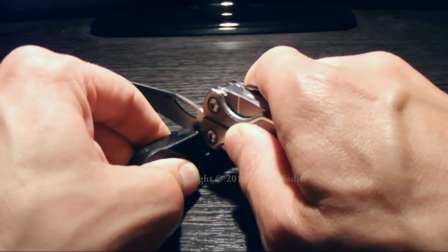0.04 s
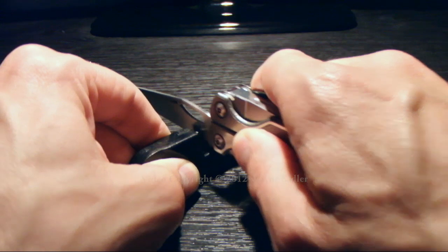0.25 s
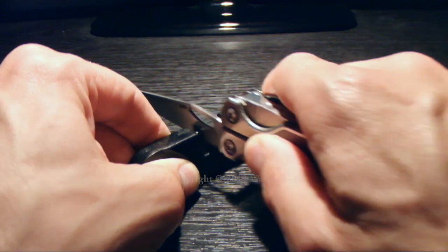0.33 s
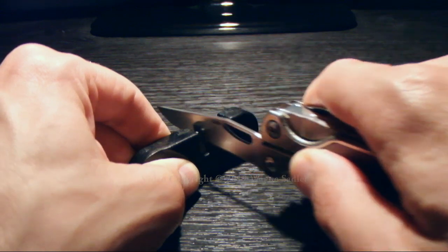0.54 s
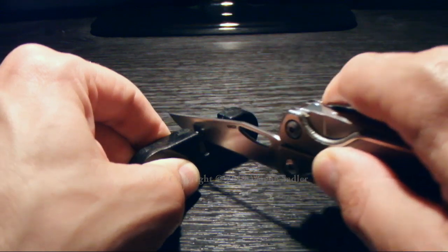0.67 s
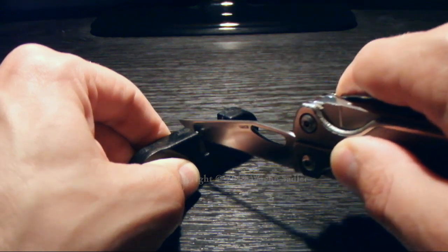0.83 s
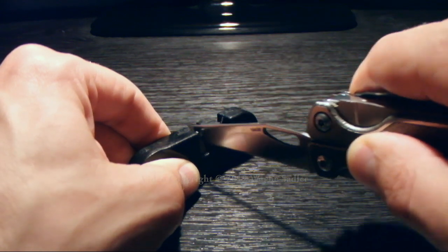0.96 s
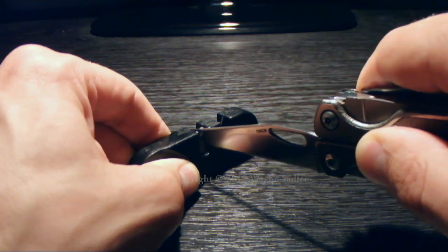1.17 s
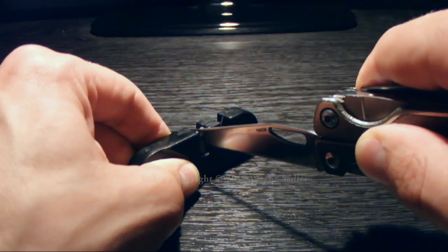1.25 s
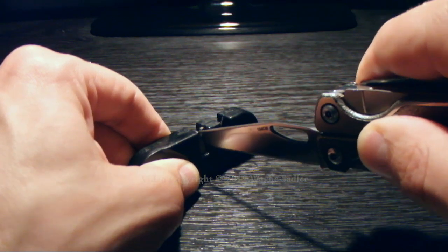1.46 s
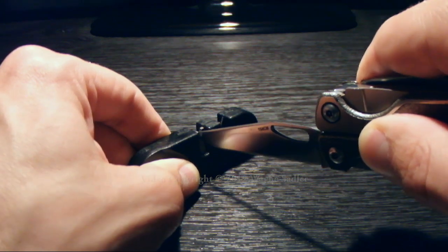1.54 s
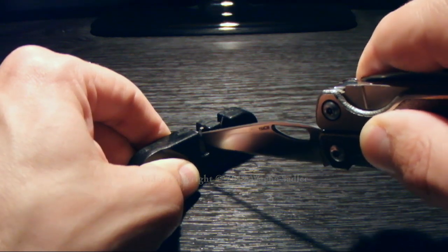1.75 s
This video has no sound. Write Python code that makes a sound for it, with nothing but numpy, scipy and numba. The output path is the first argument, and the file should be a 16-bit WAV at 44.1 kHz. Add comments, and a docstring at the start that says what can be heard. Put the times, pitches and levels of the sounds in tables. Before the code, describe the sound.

A knife knocks into a small hand sharpener on a wooden desk, scrapes through once with a gritty metallic ring, and drops out with a soft clatter. A faint motor buzz follows, heard close in a quiet room.

```python
"""Over quiet room noise, a knife lands with a knock in a small hand sharpener on a wooden desk.
It is pulled through once: grit rasps along the edge and makes the blade and the desk ring.
The tip drops out with a soft clatter, and then a hand rubs briefly.
Last, a tiny motor, probably for a lens, buzzes and ticks."""
import sys
import numpy as np
from scipy import signal
from scipy.fft import rfft, irfft
from scipy.io import wavfile
from scipy.ndimage import uniform_filter1d
from numba import njit

SR = 44100
rng = np.random.default_rng(int(sys.argv[2]) if len(sys.argv) > 2 else 0)


def dump(signal):
    """Clip the signal to [-1, 1] and save it as 16-bit WAV at the path in sys.argv[1]."""
    limited = np.clip(np.atleast_2d(signal).T, -1, 1)
    pcm = np.round(limited * 32767).astype(np.int16)
    wavfile.write(sys.argv[1], SR, pcm)


N = 79380
T = np.arange(N) / SR


def undb(db):
    """Turn decibels into a gain."""
    return 10 ** (np.asarray(db) / 20)


def unit(x):
    """Scale to an average strength (rms) of 1."""
    return x / np.sqrt(np.mean(x ** 2))


def curve(rows, column=1):
    """One column of a table, joined by straight lines in time."""
    rows = np.array(rows)
    return np.interp(T, rows[:, 0], rows[:, column])


def ramp(start_s, length_s):
    """Rise from 0 to 1."""
    return np.clip((T - start_s) / length_s, 0, 1)


def decay(fade_s):
    """Die away by 60 dB in fade_s seconds: the fade time."""
    return np.exp(-np.log(1000) * T / fade_s)


def place(x, start_s):
    """Delay a sound to its start time."""
    return np.concatenate([np.zeros(int(start_s * SR)), x])[:N]


def through(x, response):
    """Play a sound through an object, given its response to one tap."""
    return signal.fftconvolve(x, response)[:N]


def ring(notes):
    """The fading notes of an object tapped once."""
    return sum(undb(db) * decay(fade_s) * np.cos(2 * np.pi * hz * T) for hz, db, fade_s in notes)


def colour(points):
    """A click with the given balance of low and high pitches."""
    hz, db = np.array(points).T
    size = 4096
    freqs = np.maximum(np.fft.rfftfreq(size, 1 / SR), 1)
    gains = undb(np.interp(np.log(freqs), np.log(hz), db))
    cepstrum = irfft(np.log(gains))
    cepstrum[1:size // 2] *= 2  # this fold moves the energy to the click's start
    cepstrum[size // 2 + 1:] = 0
    return irfft(np.exp(rfft(cepstrum)))


def damped(x, top_hz):
    """Soften the treble."""
    return signal.sosfilt(signal.butter(2, top_hz, fs=SR, output="sos"), x)


@njit
def band(x, hz, width_hz):
    """Keep the sound near a moving pitch."""
    y, band_state, low_state = np.empty(len(x)), 0., 0.
    for i in range(len(x)):
        tuning, damping = np.tan(np.pi * hz[i] / SR), width_hz / hz[i]
        swing = (band_state + tuning * (x[i] - low_state)) / (1 + tuning * (tuning + damping))
        band_state = 2 * swing - band_state
        low_state += 2 * tuning * swing
        y[i] = damping * swing
    return y


def steep_band(x, hz, width_hz):
    """A sharper band, scaled to strength 1."""
    return unit(band(band(x, hz, width_hz), hz, width_hz))


def wander(per_s):
    """A smooth random drift of strength 1."""
    span = int(SR / per_s)
    return unit(uniform_filter1d(uniform_filter1d(rng.standard_normal(N), span), span))


def burst(fade_s):
    """A short dying rattle with energy 1."""
    rattle = rng.standard_normal(N) * decay(fade_s)
    return rattle / np.linalg.norm(rattle)


def tones(rows, waver):
    """Slightly unsteady tones."""
    return sum(np.sqrt(2) * undb(db) * np.sin(2 * np.pi * (hz * T + rng.random()) + waver * wander(28))
               for hz, db in rows)


def grit(catch, hits_per_s=5000, spread_db=2):
    """Tiny grains collide at random, harder where the surface catches."""
    hits = rng.random(N) < hits_per_s / SR
    sizes = undb(spread_db * np.minimum(rng.exponential(size=N), 5))
    return hits * sizes * np.sign(rng.standard_normal(N)) * catch


# The room's noise. Each row: pitch in Hz, relative level in dB.
AIR_COLOUR = [(15, -35), (25, -2.5), (70, -7.5), (224, -10), (268, -10), (460, -13.5), (643, -17.5),
              (922, -19), (1760, -24), (2940, -26.5), (3620, -30.5), (5320, -34), (11800, -55),
              (15400, -111), (22000, -120)]
# A faint whine. Each row: pitch in Hz, final level in dB.
WHINE_TONES = [(2989,-67.5),(3332,-75),(3908,-77.5),(4829,-82.5),(5405,-77)]
def background():
    """Room noise and a faint whine grow louder, then hold."""
    air = undb(-54) * unit(through(rng.standard_normal(N), colour(AIR_COLOUR)))
    swell = undb(curve([(0.28, -8.5), (1.08, 0)]))
    return (air + tones(WHINE_TONES, waver=0.68)) * swell


# The motor's buzz. Each row: pitch in Hz, level in dB.
BUZZ_TONES = [(2810,-65),(2945,-63.5),(3811,-75.5),(3946,-72),(4081,-75),(4215,-72.5),(4811,-82),(5082,-72),(5216,-69.5),(5351,-70.5),(5486,-76),(5621,-81),(6200,-85)]
# Its ticks. Each row: start in seconds, relative level in dB.
MOTOR_TICKS = [(1.5907,-23),(1.671,-34),(1.6863,-39),(1.7615,-22)]
# The tone of a tick. Each row: pitch in Hz, relative level in dB.
TICK_COLOUR = [(1000,-34),(2100,2),(2700,4),(3400,5),(4000,5),(5300,1),(6000,-8),(6800,-4.5),(8600,-16),(9800,-1),(10600,-1),(11200,-18),(13000,-27)]
def motor():
    """A tiny motor starts to buzz and ticks four times."""
    ticks = sum(undb(db) * place(burst(fade_s=0.012), start) for start, db in MOTOR_TICKS)
    buzz = ramp(1.578, 0.008) * tones(BUZZ_TONES, waver=0.75)
    return buzz + through(ticks, colour(TICK_COLOUR))


# The hand's touches. Each row: start in seconds, hold in seconds, level in dB.
HAND_RUBS = [(0.181,0.013,-58),(1.432,0.064,-51)]
# The tone of a rub. Each row: pitch in Hz, relative level in dB.
RUB_COLOUR = [(100,-9.5),(260,2),(500,-3),(700,-11.5),(1250,-14.5),(1500,-4),(2000,-8),(2250,-22),(5000,-34),(12000,-64)]
def hand_rub(rise_s=0.019, fall_s=0.037):
    """A hand slides softly on the desk, before and after the stroke."""
    swell = sum(undb(db) * ramp(start, rise_s) * (1 - ramp(start + rise_s + hold, fall_s))
                for start, hold, db in HAND_RUBS)
    return swell * unit(through(grit(catch=1), colour(RUB_COLOUR)))


WOOD_TOP_HZ = 1290
# The notes of desk and sharpener. Each row: pitch in Hz, relative level in dB, fade time in seconds.
DESK_NOTES = [(124,-23,0.11),(215,-6.5,0.17),(268.5,2.5,0.095),(297,-2.5,0.087),(361,-4,0.35),(396.4,-0.5,0.12),(414.4,-2,0.14),(486,-6.5,0.16),(630,-25,0.069),(702,-8,0.15),(819,-8.5,0.069),(966,-15.5,0.065),(962,-7.5,0.05)]
def desk_ring():
    """Tapped wood rings and soaks up the treble."""
    return damped(ring(DESK_NOTES), WOOD_TOP_HZ)


# The load on the desk. Each row: time in seconds, relative level in dB.
DESK_LOAD = [(0.34,-40),(0.38,-50.5),(0.55,-48.5),(0.67,-43.5),(0.70,-42.5),(0.884,-46.5),(0.915,-55),(0.94,-44.5),(1.0,-46.5)]
def desk_rumble(grains):
    """Grit shakes the desk as the knife presses down."""
    return unit(through(grains, desk_ring())) * undb(curve(DESK_LOAD) - 0.5)


# The desk's deepest notes. Each row: pitch in Hz, relative level in dB, fade time in seconds.
DEEP_NOTES = [(118.6,-10.5,0.16),(180,-18,0.064),(202.8,-0.5,0.31)]
# The booms. Each row: start in seconds, relative level in dB.
DESK_BOOMS = [(0.2447,-25),(0.2973,-29)]
def desk_boom():
    """The hand's weight makes the desk boom as the blade settles in."""
    boom = ring(DEEP_NOTES) * ramp(0, 0.0051)
    return sum(undb(db) * place(boom, start) for start, db in DESK_BOOMS)


def desk_drone(grains):
    """Grit keeps those deep notes going early in the stroke."""
    drone = unit(through(grains, damped(ring(DEEP_NOTES), WOOD_TOP_HZ)))
    return undb(-46.5) * drone * (1 - ramp(0.494, 0.093))


# The blade's knocks. Each row: start in seconds, relative thud and crack levels in dB, contact in ms.
BLADE_KNOCKS = [(0.2319,-38.5,-41,0.61),(0.2359,-28.5,-21.5,0.72),(0.2396,-60,-51,0.62),(0.2448,-38.5,-47,0.37),(0.2646,-42,-42,3),(0.316,-57,-68,2.2),(1.0111,-37.5,-37.5,1.4),(1.03,-43.5,-62,0.93),(1.0404,-37.5,-37.5,1.25),(1.0558,-41,-70,0.8)]
# The tone of a crack. Each row: pitch in Hz, relative level in dB.
CRACK_COLOUR = [(30,-19),(90,11),(200,-11.5),(500,-13.5),(800,-0.5),(1100,1.5),(1500,-0.5),(2500,-11.5),(3500,-19.5),(6000,-22),(7000,-35),(7800,-22),(10000,-50.5),(13000,-48)]
def knocks():
    """Going in and dropping out, the blade thuds on the desk and rattles the housing."""
    pushes, cracks = np.zeros(N), np.zeros(N)
    for start, thud_db, crack_db, contact_ms in BLADE_KNOCKS:
        pulse = np.sin(np.pi * np.minimum(T * 1000 / contact_ms, 1))
        pushes += undb(thud_db) * place(pulse / pulse.sum(), start)
        crack = (T == 0) + undb(3.5) * burst(fade_s=0.049)  # a click, then a rattle
        cracks += undb(crack_db) * place(crack, start)
    housing = colour(CRACK_COLOUR)
    return through(pushes, desk_ring()) - through(cracks, housing / np.abs(housing).max())


# The edge's squeal. Each row: time in seconds, level in dB.
SQUEAL_LEVELS = [(0.41,-81),(0.432,-59.5),(0.452,-54.5),(0.49,-63),(0.55,-66.5),(0.594,-58.5),(0.625,-81),(0.9,-81),(0.934,-68),(0.948,-80),(0.966,-67),(0.99,-92),(1.045,-84),(1.1,-93)]
def edge_squeal(grains):
    """The edge squeals thinly, sliding up in pitch near the start."""
    pitch_hz = curve([(0.425, 7330), (0.452, 7710)])
    return steep_band(grains, pitch_hz, width_hz=480) * undb(curve(SQUEAL_LEVELS))


# The blade's higher ring. Each row: time in seconds, pitch in Hz, level in dB.
HIGH_RING = [(0.27,2410,-53.5),(0.33,2570,-52.5),(0.4,2340,-58),(0.52,2230,-47),(0.59,2340,-45),(0.66,2500,-49.5),(0.76,2600,-52.5),(0.86,2720,-56.5),(0.96,2600,-58),(1.1,2500,-74)]
def high_ring(grains):
    """A higher ring climbs unevenly as the free part of the blade shortens."""
    return steep_band(grains, curve(HIGH_RING), width_hz=410) * undb(curve(HIGH_RING, column=2))


# The plastic body's notes. Each row: pitch in Hz, relative level in dB, fade time in seconds.
BODY_NOTES = [(393,-4,0.13),(487,3,0.18),(630.3,7,0.19),(693,5,0.17),(770,-2.5,0.3),(952.6,6,0.28),(1025,7,0.2),(1040,-25.5,0.077)]
def body_ring(grains):
    """The sharpener's plastic body shakes with the blade."""
    return unit(through(grains, damped(ring(BODY_NOTES), top_hz=1820)))


# The blade's notes in the slot. Each row: pitch in Hz, relative level in dB, fade time in seconds.
BLADE_NOTES = [(1373,-7,0.098),(1408,-1.5,0.11),(1462,5,0.055),(1515,-4.5,0.038),(1560,-1,0.055),(1632,-1,0.036),(1700,-36,0.05),(1694,-7,0.03),(1851,-5.5,0.1)]
# Where its ring is brought out. Each row: time in seconds, pitch in Hz.
BLADE_PITCH = [(0.3,1580),(0.38,1670),(0.48,1620),(0.6,1610),(0.68,1533),(1.05,1558)]
def blade_ring(grains):
    """Grit rings the blade; the ring sinks as the contact nears the tip."""
    ringing = through(grains, ring(BLADE_NOTES))
    return unit(band(ringing, curve(BLADE_PITCH), width_hz=210))


# The pull of the knife. Each row: time in seconds, relative ring level in dB, rasp level in dB.
STROKE_LEVELS = [(0.25,-38.5,-55),(0.296,-49.5,-50),(0.335,-40.5,-50),(0.38,-42,-58),(0.435,-37.5,-49),(0.455,-33.5,-47.5),(0.5,-30.5,-48),(0.56,-35.5,-48.5),(0.582,-34.5,-43),(0.604,-35,-45),(0.645,-38.5,-47),(0.725,-49,-49.5),(0.79,-46,-54),(0.84,-51.5,-58),(0.915,-47,-53),(0.966,-47.5,-50.5),(0.992,-45.5,-53),(1.07,-46.5,-54),(1.12,-60,-50)]
# The tone of the rasp. Each row: pitch in Hz, relative level in dB.
RASP_COLOUR = [(150,-3),(500,-0.5),(1000,2),(1250,-8),(1850,-3),(2080,4),(2330,-1),(2750,3.5),(3150,-10),(4150,-9.5),(5800,-18),(8800,-29),(11000,-36),(14000,-48)]
def knife_stroke(start_s=0.241, end_s=1.115, fade_s=0.028):
    """Grit rasps on the edge and shakes blade, sharpener and desk while the knife is in the slot."""
    contact = ramp(start_s, fade_s) * (1 - ramp(end_s - fade_s, fade_s))
    catch = undb(1.77 * wander(per_s=80))
    grains = grit(catch)
    ringing = blade_ring(grains) + undb(-13.5) * body_ring(grains)
    chatter = ringing * undb(curve(STROKE_LEVELS) - 0.5)
    rasp = unit(through(grit(catch), colour(RASP_COLOUR))) * undb(curve(STROKE_LEVELS, column=2))
    desk = desk_rumble(grit(catch)) + desk_drone(grains)
    return contact * (chatter + high_ring(grains) + rasp + desk + edge_squeal(grains))


def scene():
    """The sharpening echoes in a small room; the motor and room noise join it."""
    sharpening = knife_stroke() + knocks() + desk_boom() + hand_rub()
    room = rng.standard_normal(N) * decay(fade_s=0.17) * ramp(0.0056, 0.0016)
    echo = undb(-7.5) * through(sharpening, room / np.linalg.norm(room))
    return (sharpening + echo + motor() + background())[None]


def record(dry):
    """Cut the treble above 13000 Hz."""
    return signal.sosfilt(signal.ellip(8, .2, 70, 13000, fs=SR, output="sos"), dry)


dry = scene()
out = record(dry)
dump(out)
```